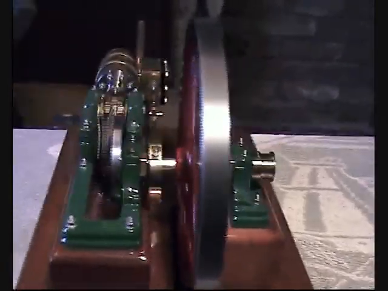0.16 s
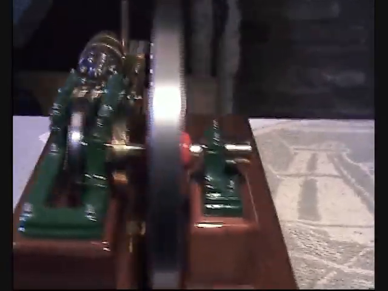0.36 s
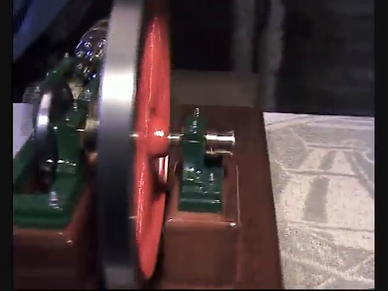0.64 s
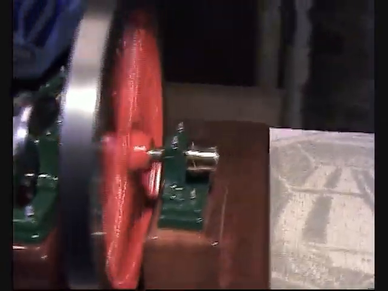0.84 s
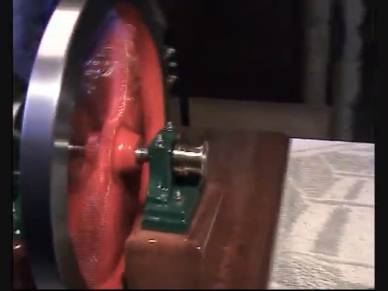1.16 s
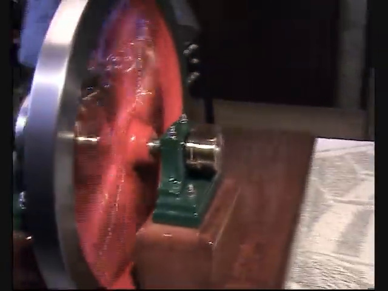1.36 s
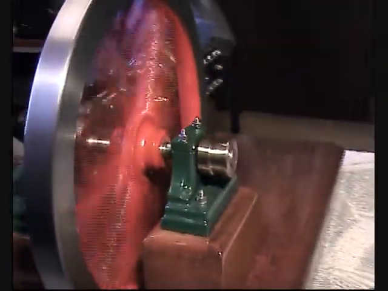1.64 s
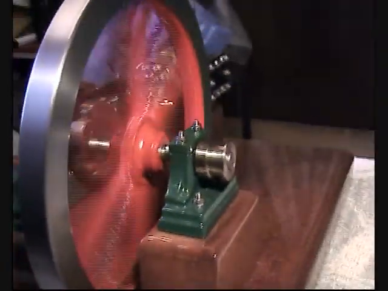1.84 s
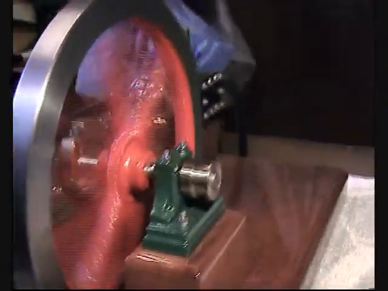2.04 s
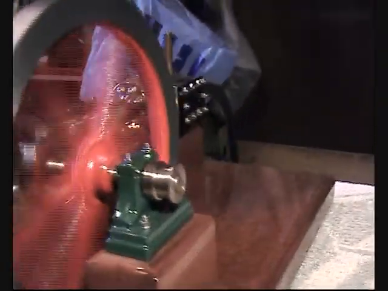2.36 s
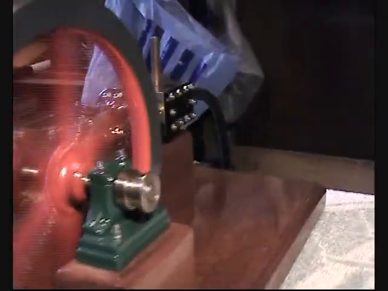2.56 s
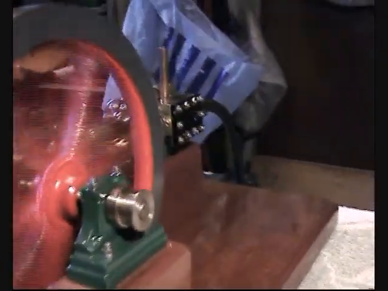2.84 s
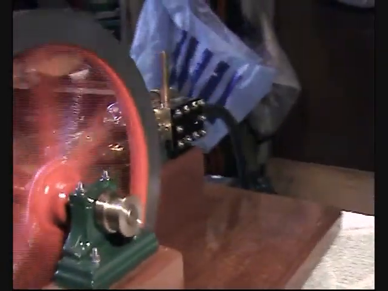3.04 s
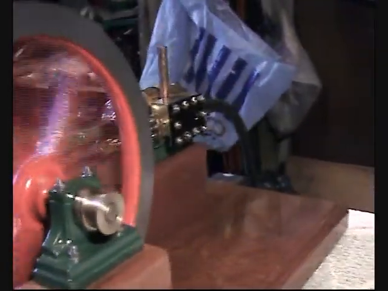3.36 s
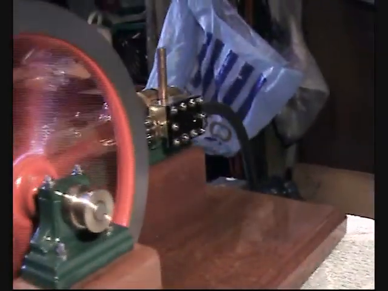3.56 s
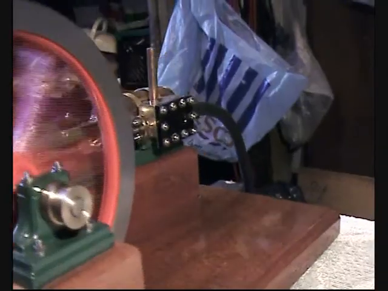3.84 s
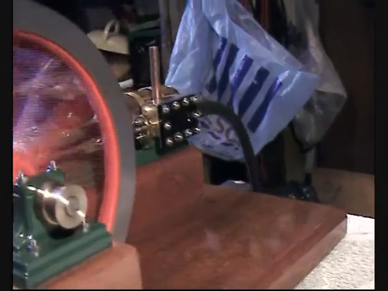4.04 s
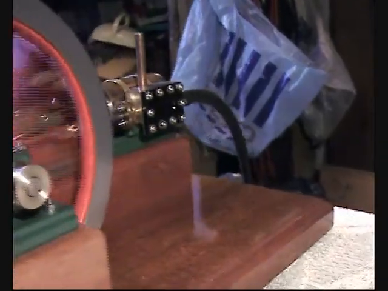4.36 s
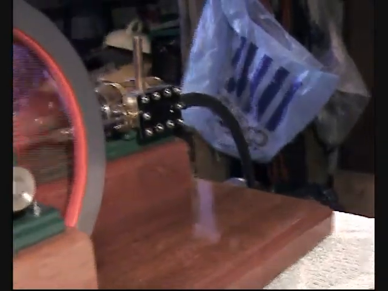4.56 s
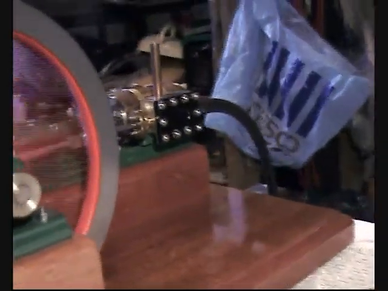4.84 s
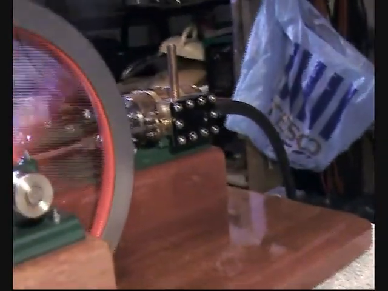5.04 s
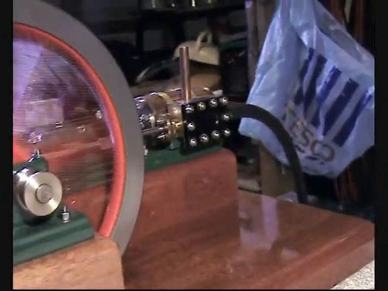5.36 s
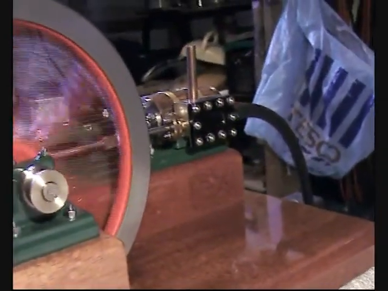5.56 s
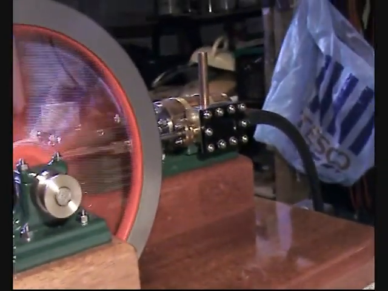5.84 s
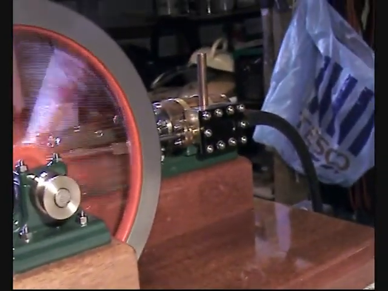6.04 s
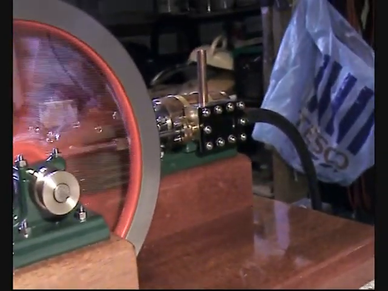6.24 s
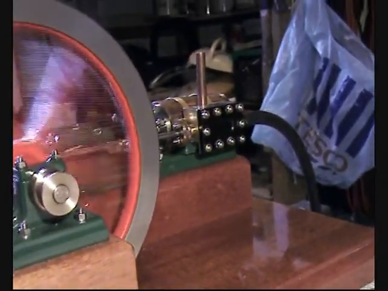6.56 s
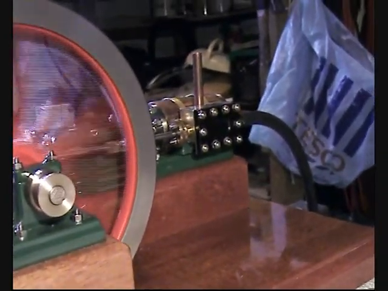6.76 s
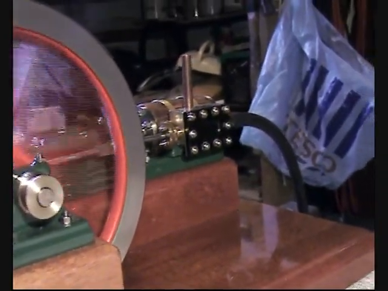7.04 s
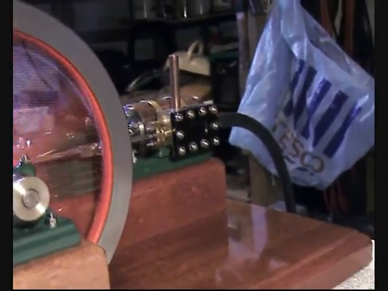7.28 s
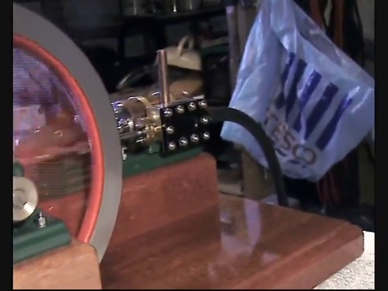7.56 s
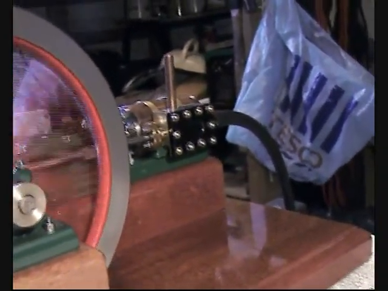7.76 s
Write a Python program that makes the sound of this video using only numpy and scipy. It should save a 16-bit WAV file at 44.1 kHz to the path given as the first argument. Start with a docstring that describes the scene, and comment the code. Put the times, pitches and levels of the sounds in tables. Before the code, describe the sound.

From 0 seconds a small model engine is already running on compressed air, heard very close in a small workshop. About 5.6 times a second it repeats one dense, uneven round of crisp steel ticks, midrange iron knocks and duller wooden taps, with five short rushes of bright air and light scraping between them. A steady leak hisses throughout, slightly sputtering. It is a little louder at the very start, settling by about 1 second. Until about 5 seconds the microphone moves round the flywheel towards the cylinder, and near reflections give the treble a gently shifting, hollow colouring. Between 3 and 4.6 seconds the low thump of the base, near 140 hertz, becomes clearly stronger and stays so. The pace eases very slightly, to nearly 5.4 turns a second by about 8 seconds, without stopping. Faint short echo, quiet rumble and background hiss remain beneath.

```python
"""A small cluttered workshop: a model steam engine on a wooden base runs on compressed air, slowing gently
to about five and a half turns a second. Every turn repeats one round of knocks (noise bursts and impulses
through resonant spectra), rushes of air and scraping (gated noise) and a thump of the base (decaying modes),
over a steady leak. A close microphone moves round the flywheel towards the cylinder: reflections comb-filter
the sound. A faint echo, a low rumble and a hiss lie behind."""
import sys
import numpy as np
from scipy import signal
from scipy.fft import rfft, irfft
from scipy.io import wavfile

SR = 44100
rng = np.random.default_rng(int(sys.argv[2]) if len(sys.argv) > 2 else 0)


def to_wav(sig):
    """Store sig (one row per channel, or 1-D mono) as 16-bit WAV at the path in sys.argv[1].

    Samples outside -1..1 are clipped; the rate is SR.
    """
    pcm = np.clip(np.atleast_2d(sig), -1, 1) * 32767
    pcm = np.round(pcm).astype(np.int16)
    wavfile.write(sys.argv[1], SR, pcm.T)  # frames by channels


N = 348831
TIME = np.arange(N) / SR  # [s]

# Joints that knock in one turn, relative levels:
# (place in the turn [0-1], steel tick [dB], iron bed [dB], wooden base [dB])
KNOCKS = [(.073, -25, -28, -38), (.121, -19, -25.5, -43), (.135, -27, -25, -36), (.205, -17, -37, -37),
          (.239, -16, -28.5, -32), (.303, -32, -32, -36), (.352, -31, -36.5, -36.5),
          (.383, -16.5, -30, -42), (.399, -32, -25.5, -32), (.613, -43, -29.5, -33),
          (.661, -17.5, -39.5, -43), (.682, -17, -23.5, -42), (.731, -20.5, -33.5, -39),
          (.777, -22.5, -34, -35), (.819, -19.5, -42, -52), (.84, -22, -31.5, -40.5),
          (.889, -18, -40, -35.5)]
# Rushes of air and friction as valve and piston move, relative levels:
# (opening place [0-1 turn], closing place [0-1 turn], air [dB], scrape [dB])
RUSHES = [(0.172, 0.257, -17, -28), (0.293, 0.41, -19, -34), (.443, .625, -17, -27),
          (0.664, 0.74, -22.5, -42), (0.823, 0.9, -20, -36)]
# Low modes of the wooden base: (frequency [Hz], relative level [dB], 60 dB decay time [s])
BASE_MODES = [(148.4, -33.5, 0.11), (136.3, -39, 0.12)]
# Places where the piston reverses: (loaded reversal [0-1 turn], return [0-1 turn])
REVERSAL_PLACES = (.131, .805)

# Spectrum of escaping air: (frequency [Hz], relative level [dB])
AIR_SPECTRUM = [(300, -26.5), (1000, -32), (2300, -11.5), (3200, -4), (4300, 0), (5500, 1), (6200, -3),
                (7100, -6.5), (8200, -1.5), (9200, -0.5), (10200, -0.5), (11000, -9)]
# Spectrum of steel striking steel: (frequency [Hz], relative level [dB])
STEEL_SPECTRUM = [(400, -25.5), (1300, -16.5), (2300, -7.5), (3300, -2), (4400, 5.5), (5500, 5),
                  (6300, -1.5), (7100, -0.5), (8500, 0.5), (10100, -2), (11000, -2.5)]
# Response of the iron bed: (frequency [Hz], relative level [dB])
BED_SPECTRUM = [(300, -27), (700, -6), (1000, -2), (1250, 2.5), (1550, -0.5), (1880, -2), (2120, -9),
                (3000, -9.5), (6000, -23.5)]
# Response of the wooden base: (frequency [Hz], relative level [dB])
BASE_SPECTRUM = [(40, -12), (120, 1.5), (240, -5.5), (320, 0), (420, -3.5), (640, 4.5), (900, -1.5),
                 (1400, -10), (3000, -18)]
# Spectrum of the crosshead grinding on its guide: (frequency [Hz], relative level [dB])
SCRAPE_SPECTRUM = [(40, -23), (150, -11.5), (400, -13), (640, -3.5), (950, -0.5), (1280, 2), (1850, 1),
                   (2150, -13.5), (4000, -32), (9000, -26)]
# Spectrum of the background rumble: (frequency [Hz], relative level [dB])
RUMBLE_SPECTRUM = [(20, -4), (55, 3.5), (100, -3), (150, -11), (250, -15), (500, -29), (2000, -48)]
# Spectrum of the background hiss: (frequency [Hz], relative level [dB])
HISS_SPECTRUM = [(20, 1), (200, -4.5), (330, -3), (1100, -3.5), (1550, -5.5), (2400, -3), (3300, -5),
                 (4700, 2), (8000, 4), (10500, 2)]

# Microphone path from the open crank, past the flywheel, to the base:
# (time [s], engine gain [dB], extra bed gain [dB], thump gain [dB])
MICROPHONE_PATH = [(0, 2, -.5, -12), (1.1, -0.33, 0.1, -5), (2.9, -0.43, -0.4, -3.5),
                   (4.6, 0.33, 0.64, 5.5), (7.9, -.2, 0.9, 6)]
# Surfaces passed by the microphone: (time when nearest [s], Gaussian width of reach [s],
# extra path when nearest [m], change of path [m/s], strength in the high treble [ratio, negative = inverted])
REFLECTORS = [(-.1, 1.96, .1721, .0114, .38), (.7, .78, .1573, .0089, .52), (.99, .71, .0824, -.0258, .29),
              (1.14, 4, .0916, .0155, -.21), (1.36, 1.98, .1426, .0161, .29),
              (1.51, .5, .1137, -.0043, .38), (2.8, 4, .0822, .0228, .12), (3.36, .96, .0792, -.007, -.38),
              (3.5, 1.82, .0438, -.0014, -.35)]
# Difference of the two capsules, before scaling: (frequency [Hz], left minus right [dB])
CAPSULE_TILT = [(100, .3), (2700, .4), (4000, -.4), (5300, -1.5), (6500, 0), (7200, -1.5), (8100, 3),
                (9200, 3.3), (10700, 3)]
# Reverberation of the workshop: (frequency [Hz], 60 dB decay time [s])
ROOM_DECAY = [(100, 0.33), (1000, 0.2), (4000, 0.43), (11000, 0.12)]

# Flywheel: speeds [turns/s], time constant of slowing [s], first place in the turn [0-1]
START_SPEED, END_SPEED, SETTLE_S, START_PLACE = 5.6423, 5.33859, 6, .3632
CHATTER_S, BODY_LAG_S = .0014, .000775  # steel chatter's peak time; delay of bed and base behind steel
RUSH_ATTACK_S, RUSH_RELEASE_S = .0025, .0061  # ramp and decay constant, at the final speed
LEAK_DB, RUB_DB = -20.5, -35  # relative levels of the steady leak and the rubbing bearings
ARRIVE_S = 5.11  # the reflections stay as they are from here on
REFLECT_ABOVE_HZ = 2950  # longer waves bend round the small parts
SOUND_M_PER_S = 343
EDGE_HZ = 10800  # upper band limit


def turns_made(t):
    """Rotational kinematics: the speed relaxes exponentially, and its integral is the crank's turns."""
    slowing = (START_SPEED - END_SPEED) * SETTLE_S * (1 - np.exp(-t / SETTLE_S))
    return START_PLACE + END_SPEED * t + slowing


def moments(place):
    """Periodic excitation: the times [s] at which the crank passes one place in its turn."""
    turns = turns_made(TIME)
    passes = np.arange(np.ceil(turns[-1])) + place
    inside = (passes > turns[0]) & (passes < turns[-1])
    return np.interp(passes[inside], turns, TIME)


def knocks(uneven_db, jitter_s, loose):
    """Impact excitation: joints take up their play, steel chatters, and the blow rings bed and base."""
    steel, bed, base = np.zeros((3, N))
    t = np.arange(SR // 30) / SR
    rise = t / CHATTER_S
    for place, steel_db, bed_db, base_db in KNOCKS:
        for moment in moments(place):
            late, force, bright = rng.standard_normal(3)
            chatter = rng.standard_normal((2, len(t))) * rise * np.exp(-rise)
            chatter /= np.linalg.norm(chatter[0])
            impulse = t == 0
            blow = (impulse + loose * chatter[1]) / np.hypot(1, loose)
            # table levels hold for a two-hundredth of a second
            size = gain_of(uneven_db * force) * np.sqrt(SR / 200)
            struck = moment + jitter_s * late
            add(steel, struck, size * gain_of(steel_db + bright) * chatter[0])
            add(bed, struck + BODY_LAG_S, size * gain_of(bed_db) * blow)
            add(base, struck + BODY_LAG_S, size * gain_of(base_db) * blow)
    body = colour(bed, BED_SPECTRUM) + colour(base, BASE_SPECTRUM)
    return colour(steel, STEEL_SPECTRUM), body


def stroke_levels():
    """Addition of powers: each rush opens quickly, holds and dies away, while the air leak goes on."""
    turns = turns_made(TIME)
    air_power, scrape_power = gain_of(LEAK_DB) ** 2, 0
    for opens, closes, air_db, scrape_db in RUSHES:
        age = (turns - opens) % 1 / END_SPEED
        hold = (closes - opens) / END_SPEED
        attack = np.minimum(age / RUSH_ATTACK_S, 1)
        release = np.exp(-np.maximum(age - hold, 0) / RUSH_RELEASE_S)
        rush = attack * release
        air_power = air_power + (gain_of(air_db) * rush) ** 2
        scrape_power = scrape_power + (gain_of(scrape_db) * rush) ** 2
    return np.sqrt(air_power), np.sqrt(scrape_power)


def air_and_scrape(sputter_db, grit_db, swell_db):
    """Turbulence and dry friction: oily air sputters, the crosshead grinds on its guide, bearings rub."""
    air_gain, scrape_gain = stroke_levels()
    swell = swell_db * wander(12)
    sputter, grit = wander(224), wander(470)
    roughness = (grit + sputter) / np.sqrt(2)
    air = evened(rng.standard_normal(N) * gain_of(sputter_db * sputter + swell))
    scrape = evened(rng.standard_normal(N) * gain_of(grit_db * roughness + swell))
    rub = gain_of(RUB_DB) * evened(rng.standard_normal(N) * gain_of(grit_db * grit))
    friction = colour(scrape * scrape_gain, SCRAPE_SPECTRUM) + colour(rub, BED_SPECTRUM)
    return colour(air * air_gain, AIR_SPECTRUM), friction


def thump(uneven_db, rise_s, return_db):
    """Modal decay: the piston's reversal rocks the wooden base, more gently on the return."""
    t, out = np.arange(SR // 4) / SR, np.zeros(N)
    ring = 0
    for hz, db, t60 in BASE_MODES:
        ring = ring - gain_of(db - 60 * t / t60) * np.sin(2 * np.pi * hz * t)
    ring = ring * (1 - np.exp(-t / rise_s))
    for place, push_db in zip(REVERSAL_PLACES, (0, return_db)):
        for moment in moments(place):
            add(out, moment, gain_of(push_db + uneven_db * rng.standard_normal()) * ring)
    return out


def moving_microphone(x, capsule_contrast):
    """Interference: near reflections join the direct sound with changing delays; capsules differ in treble."""
    hz, t, z = signal.stft(x, SR, nperseg=1024, noverlap=768)
    hz, paths = hz[:, None], 1  # 1 is the direct path
    for nearest_s, reach_s, extra_m, drift, strength in REFLECTORS:
        past = np.minimum(t, ARRIVE_S) - nearest_s
        delay = (extra_m + drift * past) / SOUND_M_PER_S
        reach = np.exp(-.5 * (past / reach_s) ** 2)
        share = strength * reach * hz / np.hypot(hz, REFLECT_ABOVE_HZ)
        paths = paths + share * np.exp(-2j * np.pi * hz * delay)
    tilt = capsule_contrast * read(CAPSULE_TILT, hz) / 2
    stereo = z * paths * gain_of([tilt, -tilt])
    return signal.istft(stereo, SR, nperseg=1024, noverlap=768)[1][:, :N]


def room(x, echo_db, apart_db, count=6):
    """Reverberant decay: faint noise tails, partly shared by the capsules, change along the microphone's way."""
    hz, t, z = signal.stft(rng.standard_normal((count, 3, SR // 3)), SR, nperseg=256)
    decay = gain_of(-60 * t / read(ROOM_DECAY, hz)[:, None])
    tails = signal.istft(z * decay, SR, nperseg=256)[1]
    tails[..., :SR // 500] = 0  # the echo starts after 2 ms
    spot, echo = np.linspace(0, count - 1, N), 0
    for k, (common, *separate) in enumerate(tails):
        tail = common + gain_of(apart_db) * np.array(separate)
        share = np.sqrt(np.maximum(1 - abs(spot - k), 0))  # equal-power crossfade
        heard = signal.oaconvolve(x * share, tail / np.linalg.norm(common), axes=1)
        echo = echo + heard[:, :N]
    return gain_of(echo_db) * echo


def background(rumble_db, hiss_db):
    """Coherence: a low rumble is common to both capsules, while an even hiss is independent in each."""
    rumble = colour(rng.standard_normal(N), RUMBLE_SPECTRUM)
    hiss = np.array([colour(noise, HISS_SPECTRUM) for noise in rng.standard_normal((2, N))])
    return gain_of(rumble_db) * rumble + gain_of(hiss_db) * hiss


def gain_of(db):
    """Logarithmic level: decibels to amplitude ratio."""
    return 10 ** (np.asarray(db) / 20)


def evened(x):
    """Mean-power normalisation: scales to rms 1."""
    return x / np.sqrt(np.mean(x ** 2) + 1e-20)


def read(points, hz):
    """Logarithmic frequency scale: interpolates a table's values at the given frequencies."""
    f, value = np.transpose(points)
    return np.interp(np.log(hz + 1), np.log(f + 1), value)


def add(mix, s, sound):
    """Superposition: mixes a sound in at time s [s]."""
    start = int(round(s * SR))
    if 0 <= start < N:
        mix[start:start + len(sound)] += sound[:N - start]


def colour(x, spectrum, size=4096):
    """Minimum-phase filtering: a causal response of unit energy with the given spectrum."""
    hz = abs(np.fft.fftfreq(size, 1 / SR))
    beyond_edge_db = 30 * np.clip(hz / EDGE_HZ - 1, 0, 1)
    log_gain = np.log(gain_of(read(spectrum, hz) - beyond_edge_db))
    response = np.exp(np.conj(signal.hilbert(log_gain)))  # phase from the Hilbert transform
    taps = np.fft.ifft(response).real[:size // 2]
    return signal.oaconvolve(x, taps / np.linalg.norm(taps))[:N]


def wander(hz):
    """Low-pass noise: random fluctuation of rms 1, mostly slower than hz [Hz]."""
    f = np.fft.rfftfreq(N, 1 / SR)
    return evened(irfft(rfft(rng.standard_normal(N)) / (1 + (f / hz) ** 4), N))


def scene():
    """Superposition of the engine's layers, heard from the moving microphone in the workshop."""
    s, *levels = np.transpose(MICROPHONE_PATH)
    engine_db, bed_db, thump_db = (np.interp(TIME, s, level) for level in levels)
    steel, body = knocks(uneven_db=1.46, jitter_s=.0005, loose=1.4)
    air, scrape = air_and_scrape(sputter_db=1.0, grit_db=1.5, swell_db=0.66)
    engine = gain_of(engine_db) * (steel + air + gain_of(bed_db) * (body + scrape))
    rocking = gain_of(thump_db) * thump(uneven_db=-1.0, rise_s=0.0051, return_db=-11)
    near = moving_microphone(engine + rocking, capsule_contrast=1.13)
    echo = room(near, echo_db=-16, apart_db=-3)
    return near + echo + background(rumble_db=-52.0, hiss_db=-24.5)


def record(dry):
    """Amplitude and band limits: peaks are flattened just under full scale, then the treble is cut."""
    held = np.clip(dry, -.93, .93)
    low_pass = signal.firwin(301, EDGE_HZ, window=("kaiser", 8), fs=SR)
    return signal.oaconvolve(held, low_pass[None], "same")


dry = scene()
out = record(dry)
to_wav(out)
```